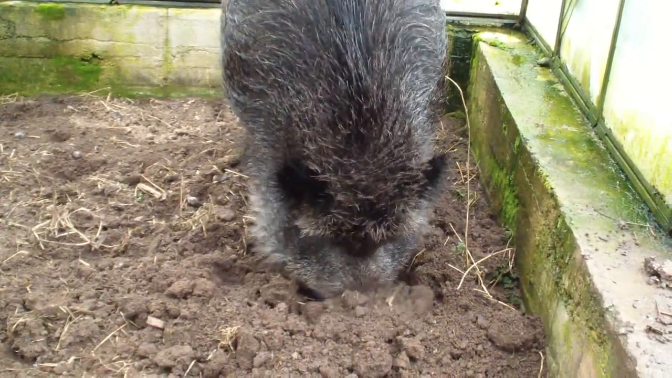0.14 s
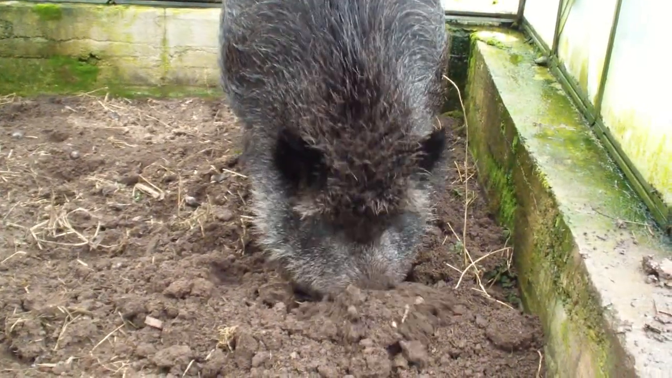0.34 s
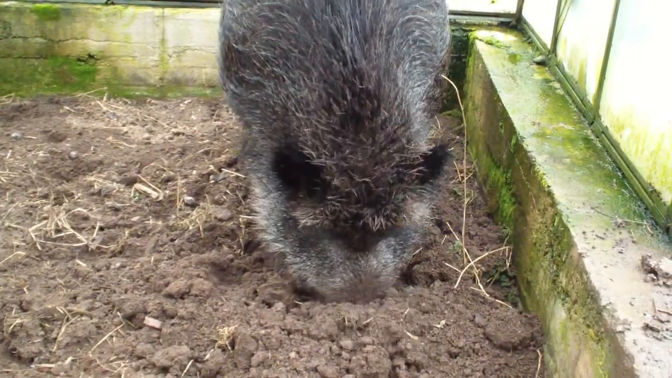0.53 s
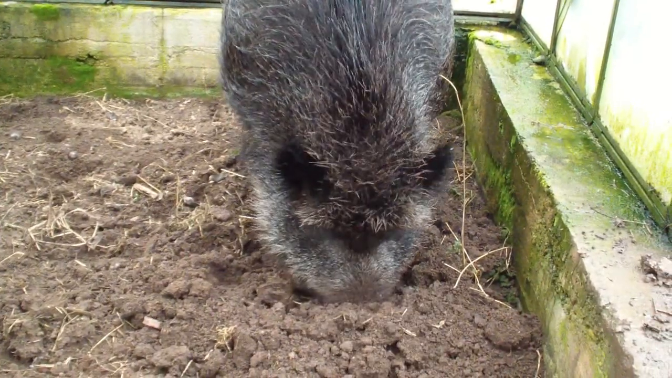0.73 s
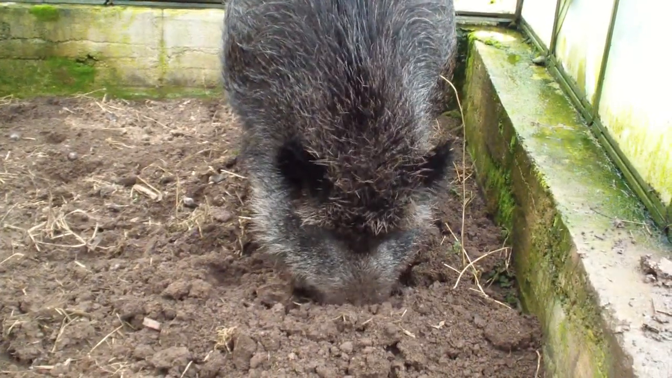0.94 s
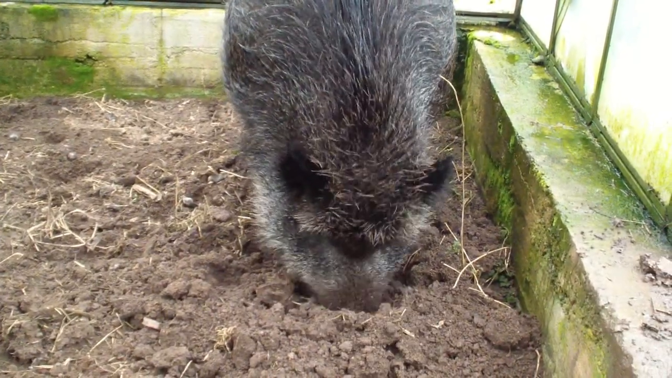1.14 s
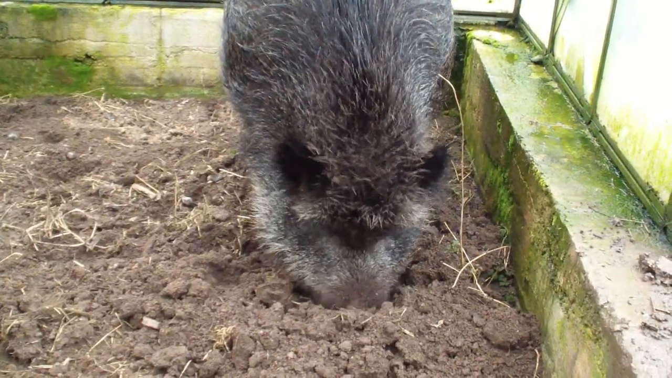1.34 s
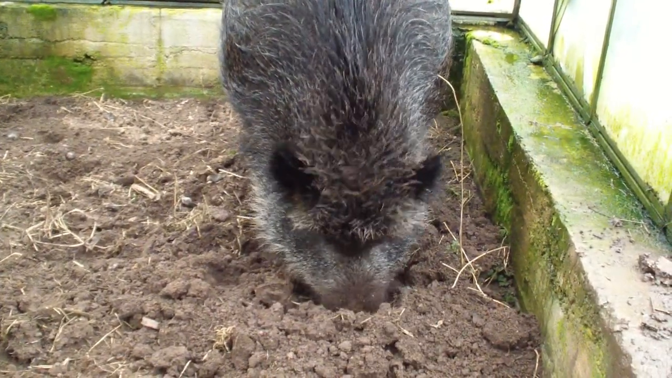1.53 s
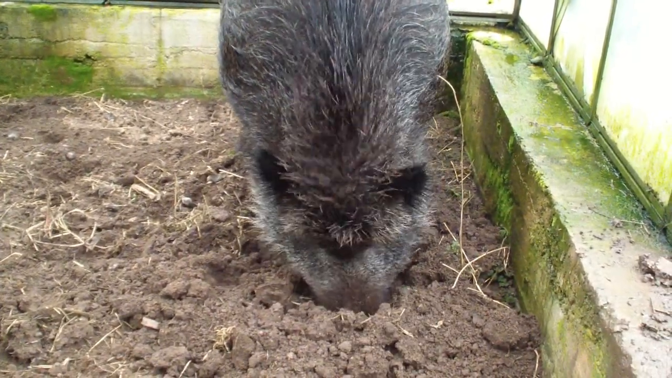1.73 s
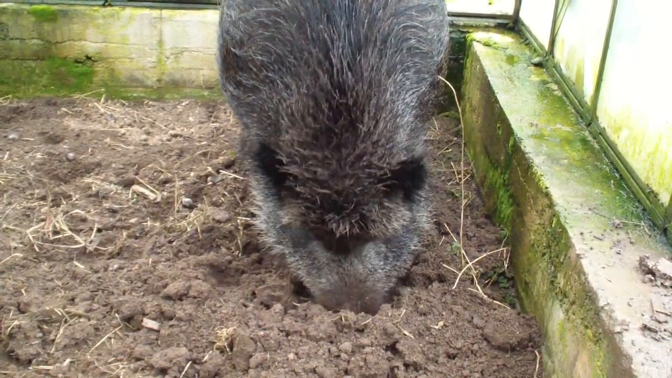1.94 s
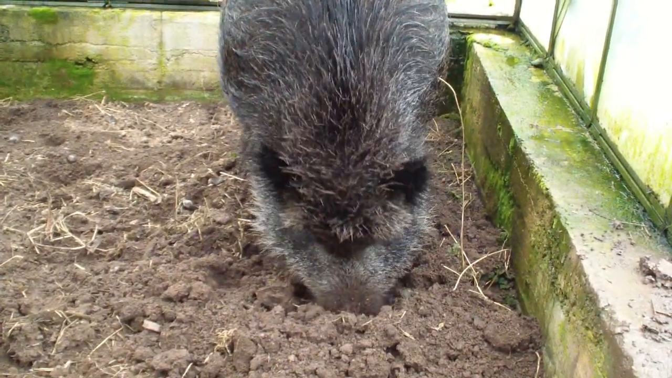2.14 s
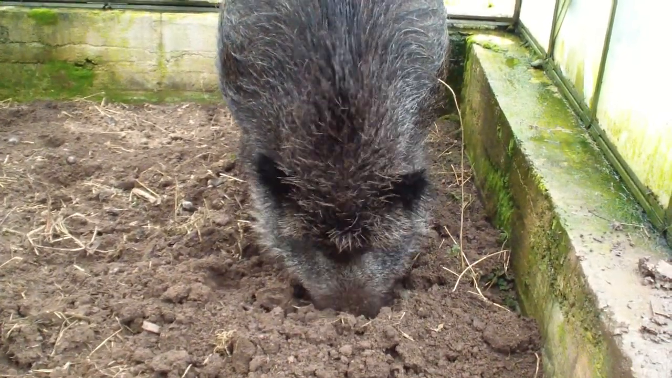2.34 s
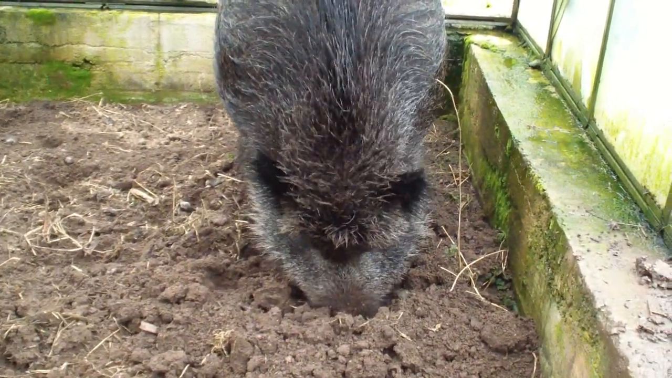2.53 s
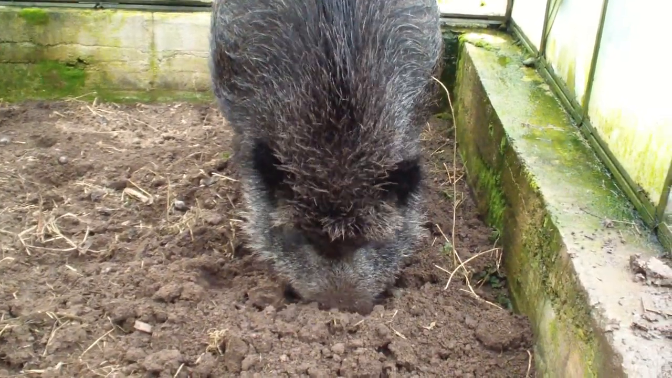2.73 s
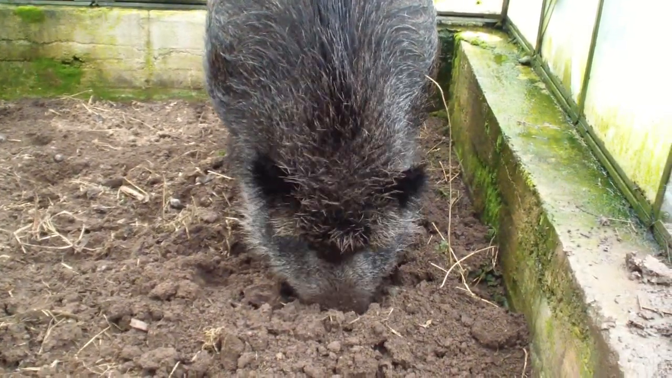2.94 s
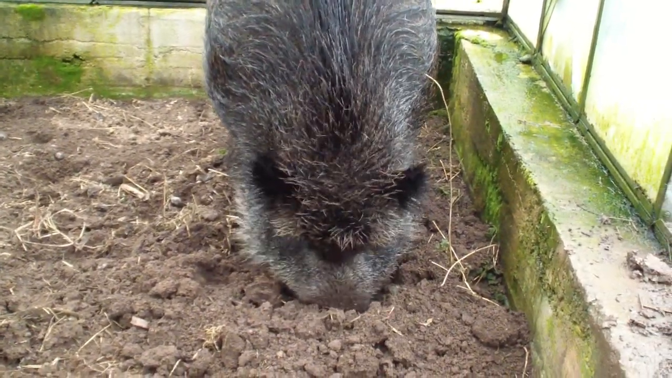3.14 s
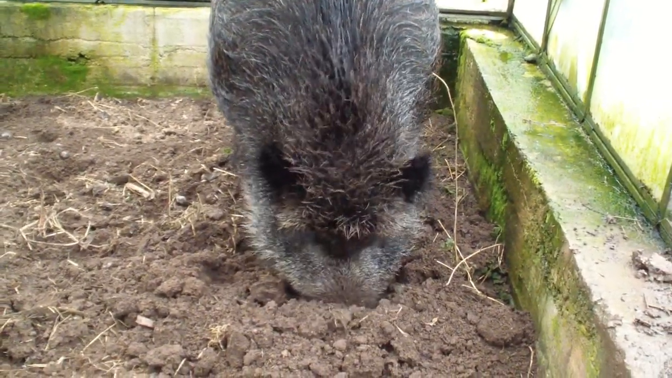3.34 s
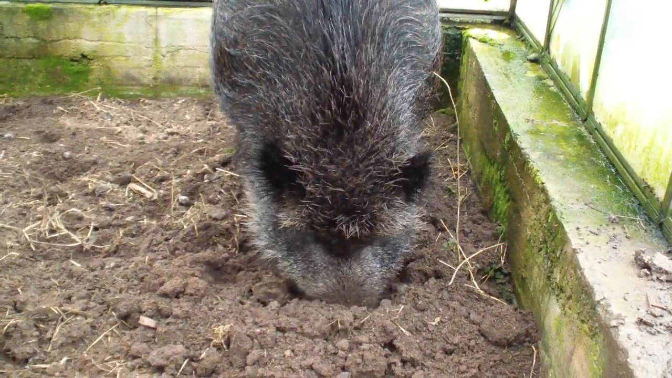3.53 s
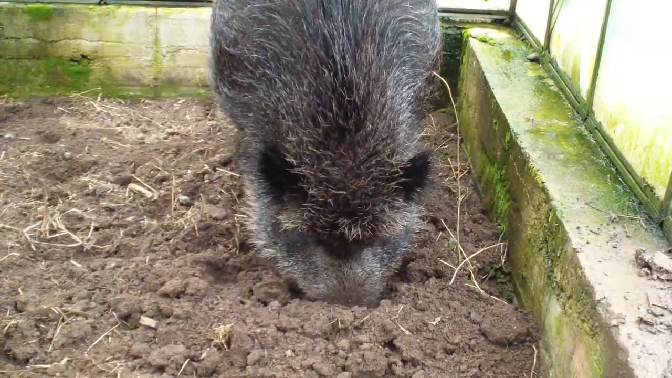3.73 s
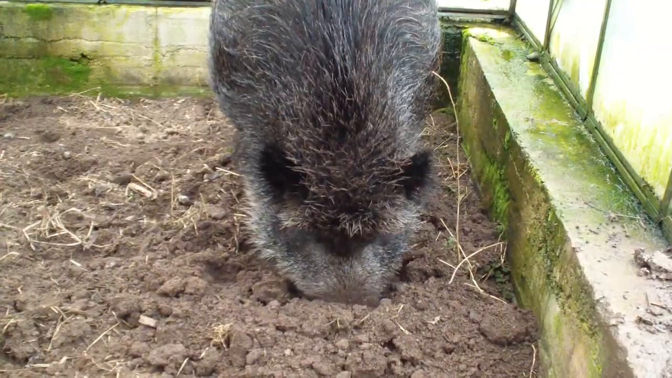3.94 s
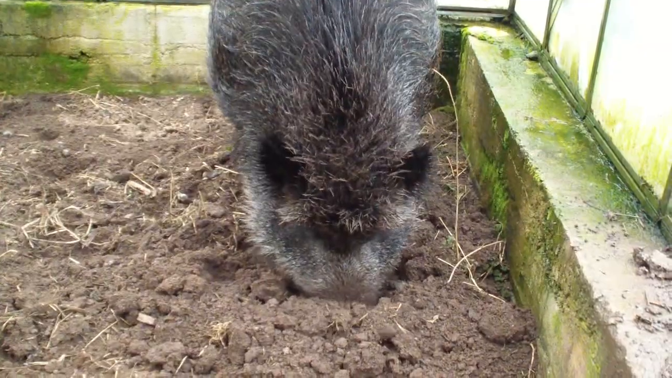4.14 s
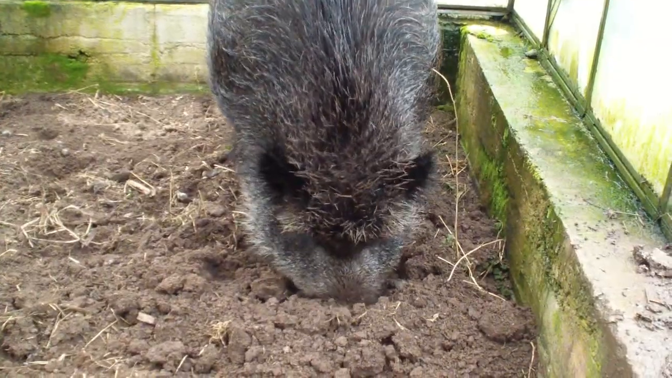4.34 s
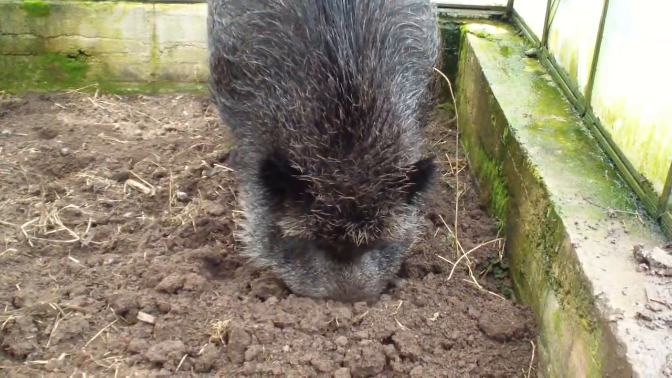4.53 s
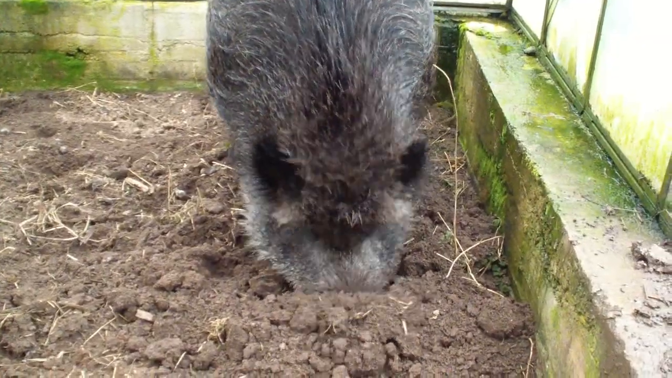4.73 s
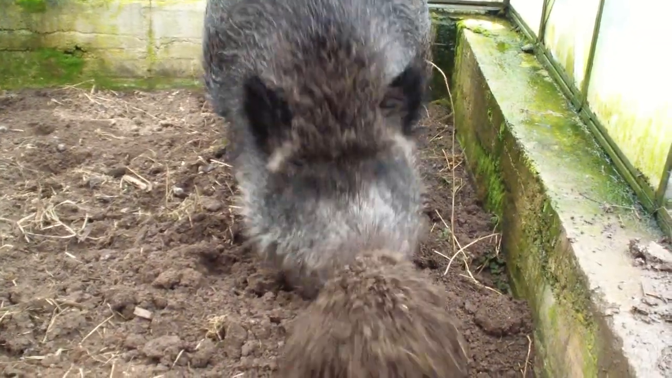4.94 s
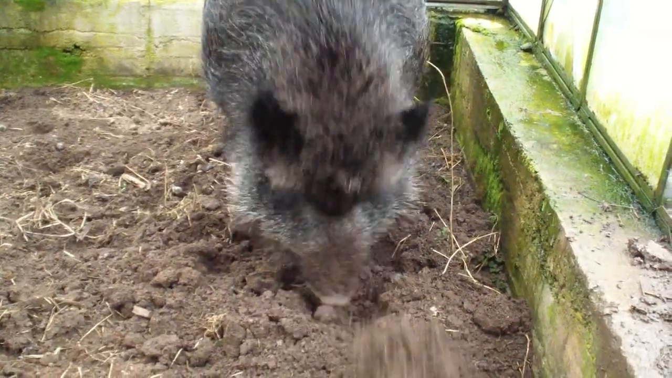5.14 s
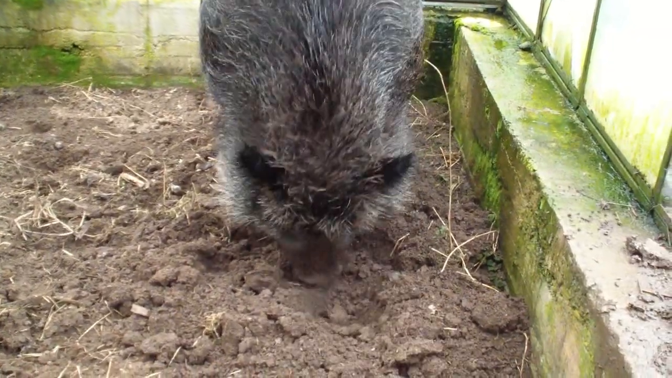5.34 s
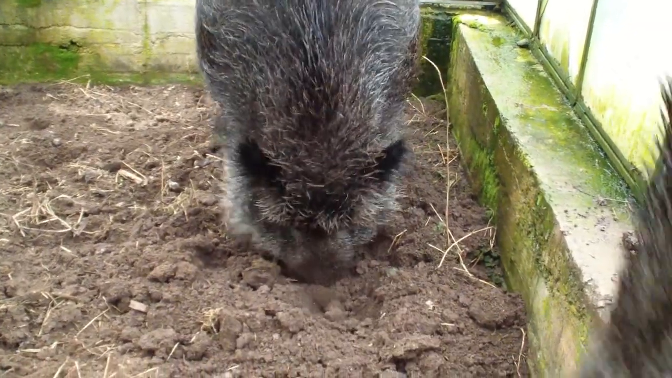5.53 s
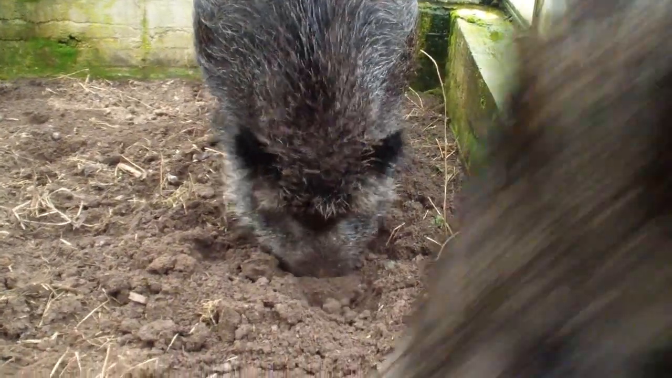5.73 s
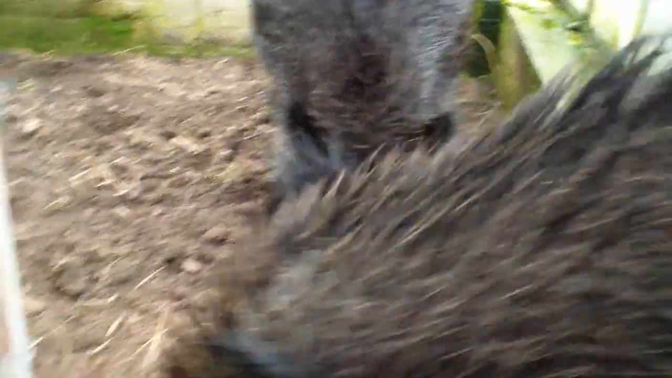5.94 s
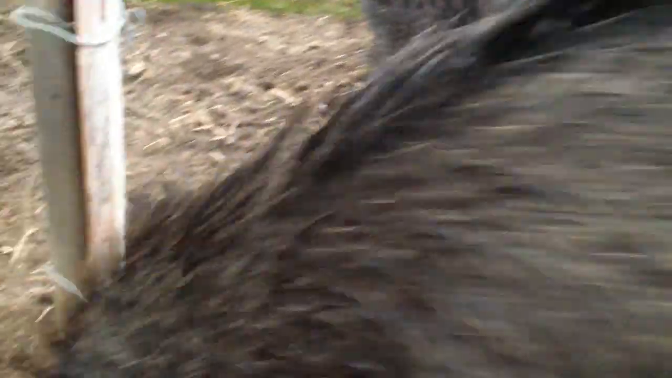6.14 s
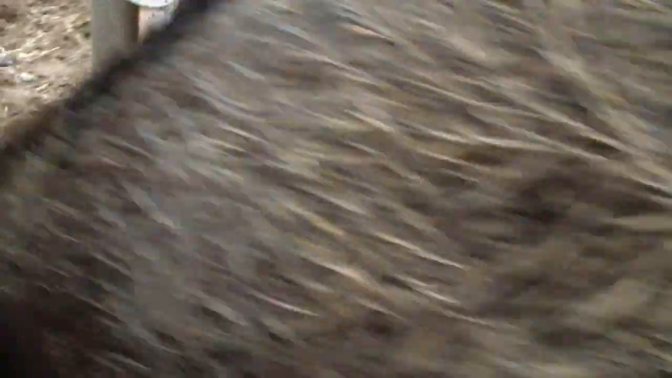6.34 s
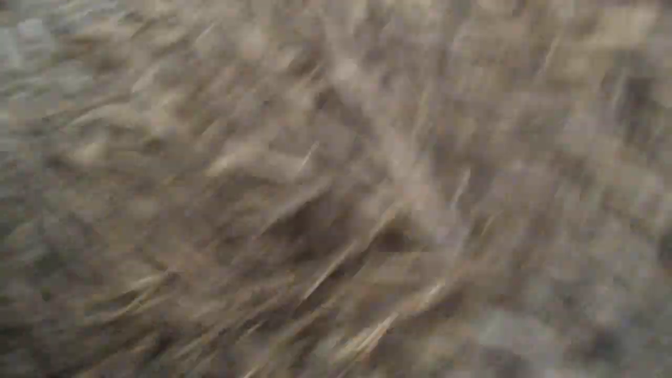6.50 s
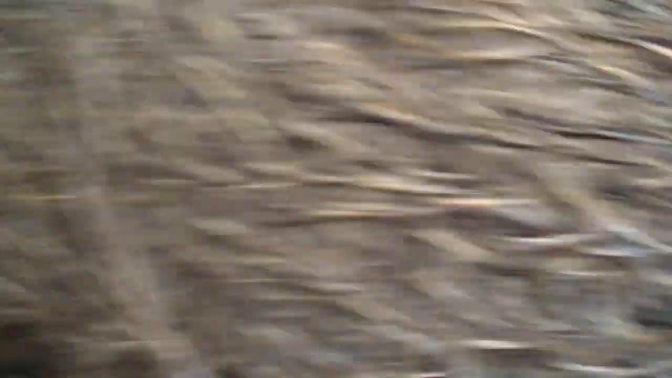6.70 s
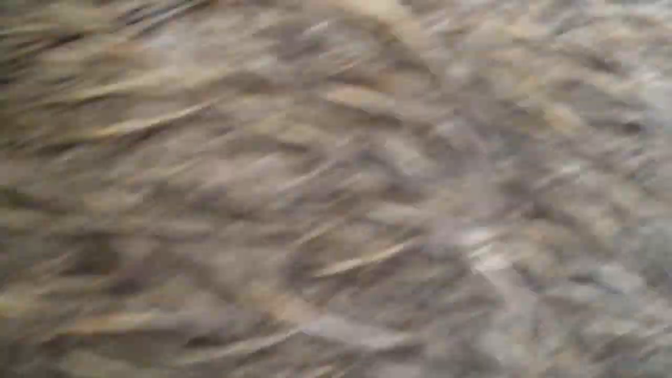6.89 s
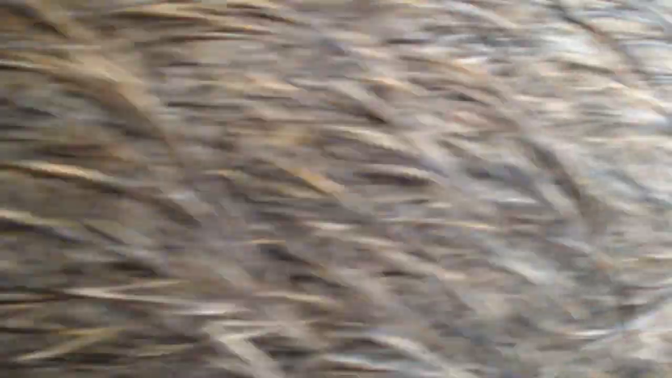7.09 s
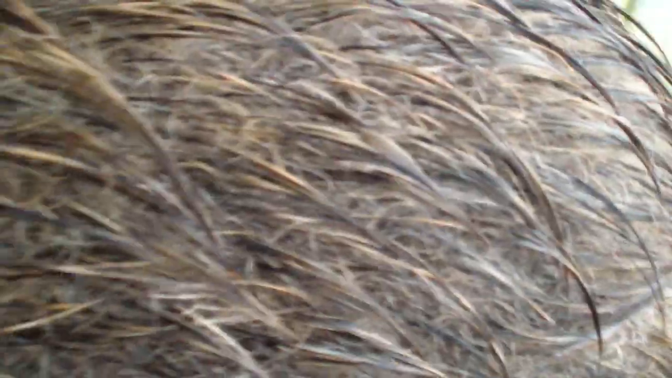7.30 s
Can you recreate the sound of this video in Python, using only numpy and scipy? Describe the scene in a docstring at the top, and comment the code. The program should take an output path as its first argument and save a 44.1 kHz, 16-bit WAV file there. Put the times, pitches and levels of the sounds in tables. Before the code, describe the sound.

Close stereo sound in a small glass-walled space with a short reverberation and quiet outdoor air. From 0 s a boar works loose soil: grains trickle, clods crumble, and a few small root ticks sound, with a sharper crack at 0.75 s. Around 1.05-1.6 s it blows a breathy, hissing puff into the earth, with short sniffs. Roots crackle at 1.65 s, then a very loud double snap at 2.02 s comes with deep dull thuds. Another blow follows at 2.8 s, small cracks at 3.4 s, and a pause with two tiny sniffs near 3.8 s. A fuller blow comes at 4.1-4.6 s, a snap at 4.3 s, and earth flung and pattering as sand around 5.1-5.4 s. At 5.4-5.5 s heavy knocks shake the stand; hard clacks hit at 5.9 and 6.18 s, thumps at 6.5 s, a tick at 6.67 s. Bristles scrape and rub throughout, fading to soft brushing with one small tap at 7.07 s.

```python
"""Rooting boar in a greenhouse

A wild boar blows and sniffs into loose soil (shaped noise), snaps roots (impulses rung through resonances)
and flings earth (grainy noise and random specks). A second boar then knocks a camera's stand (damped modes)
and drags its bristly flank along the case (rubbing noise with single scuffs).
The glass walls answer briefly (convolution with decaying noise) over a quiet outdoor background (steady noise).
"""
import sys
import numpy as np
from scipy import signal
from scipy.fft import rfft, irfft, next_fast_len
from scipy.io import wavfile
from scipy.ndimage import uniform_filter1d, map_coordinates

SR = 44100
rng = np.random.default_rng(int(sys.argv[2]) if len(sys.argv) > 2 else 0)


def to_wav(s):
    """Save 16-bit WAV."""
    ch = np.atleast_2d(s).T  # columns
    pcm = np.round(np.clip(ch, -1, 1) * 32767)  # PCM
    wavfile.write(sys.argv[1], SR, pcm.astype(np.int16))


N = 324576
T = np.arange(N) / SR
AGE = np.arange(SR * 3 // 5) / SR  # time since the onset of a single hit

# Levels are relative: each source adds a fixed trim where it is mixed.
# Snout blowing into soil: [t/s, rise/s, fall/s, airflow level/dB, hiss level/dB, hiss upper limit f/Hz,
# hollow f/Hz, hollow level/dB]
BLOW_EVENTS = [(1.05, 0.19, 0.39, -37.5, -45.5, 9300, 620, -43),
               (2.78, 0.28, 0.1, -38.3, -51, 10500, 900, -45.5),
               (4.12, 0.3, 0.21, -36.5, -48, 13600, 255, -41.5)]
# Air drawn through narrow nostrils: [t/s, rise/s, fall/s, level/dB]
SNIFF_EVENTS = [(.81, 0.021, 0.049, -50.5), (1.07, 0.039, .02, -43), (2.34, 0.042, 0.15, -54.5),
                (3.775, 0.0078, 0.012, -38.5), (3.89, 0.013, 0.022, -39)]
# Nostril resonances: [f/Hz, width/Hz, level/dB]
NOSTRIL_MODES = [(2090, 450, 12), (2760, 1240, 8)]
# Spectral density of the blown air: [f/Hz, level/dB per Hz]
BLOW_SPECTRUM = [(70, -8), (170, 3), (270, 3), (410, 0.5), (630, 2), (1100, 0), (2300, -3.5), (4500, -6.5),
                 (7000, -28)]
# Spectral density of the hissing soil: [f/Hz, level/dB per Hz]
HISS_SPECTRUM = [(1500, -58), (3500, -4), (5200, -0.5), (7500, 2.5), (10000, -1), (16000, -9)]
# Shoves of the snout through earth: [t/s, rise/s, fall/s, crumbling level/dB, ground rumble level/dB]
SHOVE_EVENTS = [(.24, 0.0099, 1, -45, -44), (.77, 0.04, 0.091, -81, -44), (1.7, 0.035, 0.29, -73, -34),
                (2.03, 0.069, 0.2, -65, -34), (2.645, 0.011, 0.049, -40, -39),
                (2.9, 0.069, 0.065, -37, -42.5), (3.28, .1, 0.15, -46, -54), (4.72, 0.36, 0.57, -40.5, -65)]
# Dull heaves of the ground: [t/s, level/dB, f/Hz]
HEAVE_EVENTS = [(0.27, -42, 255), (0.752, -43, 140), (0.767, -34, 87.5), (1.048, -36, 202),
                (1.674, -30, 200), (1.692, -32, 289), (1.737, -35, 149), (1.8, -43, 93), (2.033, -36, 105),
                (2.046, -24.5, 186), (2.092, -17.5, 73), (2.139, -28.5, 109), (2.64, -31, 158),
                (4.114, -30.5, 178), (5.2, -33, 272)]
# Small clods, grit and wet snout smacks; the last row is a knock on the case: [t/s, level/dB, f/Hz, t60/s]
SMALL_HITS = [(0.199, -39, 4770, 0.02), (0.207, -29, 4930, 0.014), (0.26, -38, 2470, 0.048),
              (.287, -40, 2580, 0.046), (.397, -45, 1200, 0.05), (0.575, -39, 5600, 0.06),
              (0.761, -33, 1720, 0.036), (1.873, -42, 1600, 0.018), (2.243, -32.5, 3920, 0.043),
              (2.253, -37.5, 7400, 0.15), (2.304, -31.5, 610, 0.049), (2.614, -32.5, 4660, 0.13),
              (2.657, -36, 2900, 0.029), (2.698, -36, 1500, .025), (2.9, -34.5, 3130, .04),
              (3.183, -36, 765, 0.03), (3.213, -35.5, 675, 0.054), (3.227, -38, 1070, 0.033),
              (3.394, -24, 1080, 0.039), (3.51, -37, 2900, 0.013), (3.562, -36.5, 700, 0.067),
              (4.011, -44, 4430, 0.014), (4.104, -32.5, 1190, 0.03), (4.47, -31, 600, 0.031),
              (4.765, -40, 2700, 0.027), (4.972, -35.5, 4800, 0.036), (5.026, -48, 2520, 0.016),
              (5.094, -37, 3420, 0.017), (5.258, -36, 1100, 0.039), (5.342, -38, 607, 0.036),
              (7.074, -25.5, 1280, 0.023)]
# Spectral density of crumbling earth: [f/Hz, level/dB per Hz]
CRUMB_SPECTRUM = [(150, -21), (400, 0.5), (850, -0.5), (1300, 1), (1700, 1.5), (2400, 3), (3500, -2),
                  (7000, -2.5), (11000, -5), (16000, -37)]
# Spectral density of the ground rumble: [f/Hz, level/dB per Hz]
GROUND_SPECTRUM = [(20, -65), (45, 8.5), (85, -0.5), (170, -4), (350, -12), (900, -45)]
# Roots breaking: [t/s, level/dB, tearing tail level/dB re the break, brightness/dB per octave, f/Hz]
SNAP_EVENTS = [(0.077, -35, -10, 10, 1940), (0.09, -43, -22, 13, 2300), (0.624, -29.5, -13, 4.5, 2680),
               (0.651, -27.5, -29, 26, 2420), (0.7472, -16, -24, 3, 2830), (0.7499, -19.5, -33, 2.5, 2050),
               (0.755, -24, -27, 11, 2400), (0.81, -28, -34, 3, 1820), (1.634, -26.5, -12, 3, 2170),
               (1.675, -20.5, -20, 0.5, 2370), (1.703, -25, -12, 2.5, 2700), (1.989, -24, -11, -2, 2550),
               (1.995, -20, -13, -4, 2420), (2.02, -2.5, -24, 2, 2330), (2.0216, -2.5, -31, -2, 2160),
               (2.031, -28, -17, 12, 2970), (2.042, -33, -17, 4, 2330), (2.063, -27, -14, -2, 2400),
               (2.099, -25.5, -22, -8, 2200), (2.307, -28.5, -9, 5, 2150), (2.614, -32, -3.5, 8, 2020),
               (2.64, -36, -5, 8, 2100), (2.655, -31, -6, 0, 2840), (2.747, -25, -13, 6, 2530),
               (3.214, -30, -28, -3, 3000), (3.357, -29, -28, 19, 2400), (3.38, -20.5, -32, 16, 2410),
               (3.395, -29, -24, 4, 3000), (3.582, -29.5, -16, 10, 2220), (4.324, -21, -27, 17, 2200)]
# Resonances of a breaking root of pitch ROOT_HZ: [f/Hz, width/Hz, level/dB]
ROOT_MODES = [(980, 137, 8), (1550, 120, 4), (2150, 280, 7), (2960, 450, 0), (3760, 1500, -10.5),
              (5160, 350, -3), (6270, 440, -1), (8700, 4000, -19.5)]
# Spectral density of earth torn open by a root: [f/Hz, level/dB per Hz]
TEAR_SPECTRUM = [(120, 7), (350, 5.5), (1000, 1), (1700, 1), (2400, 2), (3600, 3.5), (6500, -7.5),
                 (10000, -10), (16000, -38)]
# Earth lifted, then flung and raining back: [t/s, rise/s, fall/s, patter level/dB, sand level/dB]
FLING_EVENTS = [(4.7, 0.15, 0.15, -43, -72), (5.11, 0.093, 0.18, -37.5, -33)]
# Spectral density of pattering lumps: [f/Hz, level/dB per Hz]
PATTER_SPECTRUM = [(60, -14), (150, 2.5), (280, 0.5), (400, -1), (600, -4.5), (950, -13), (2000, -19),
                   (5000, -30)]
# Spectral density of falling sand: [f/Hz, level/dB per Hz]
SAND_SPECTRUM = [(710, -36), (1200, -6), (1630, -13), (2530, -2), (4130, -3), (7330, 0), (12300, -2.5),
                 (15200, -5), (16000, -18)]
# Blows on the stand: [t/s, level/dB, knock level/dB re the blow, knock f/Hz, sway t60/s,
# tube, crunch and clink level/dB re the blow, clink f/Hz]
BUMP_EVENTS = [(5.404, -17.5, -17, 806, 0.1, -27, -15, -32, 1480),
               (5.4402, -10.5, -2.5, 760, 0.082, -17, -21, -18, 1456),
               (5.4777, -7, -3.5, 814, 0.087, -10, -19, -18, 2050),
               (5.4865, -30, -3, 900, 0.06, -12, -23, 4.5, 1280),
               (5.504, -34, 0, 905, 0.13, -12, -16, 2, 1265),
               (5.524, -25.5, -4, 795, 0.27, -9.5, -4.5, -7, 1100),
               (5.9096, -24.5, 1, 700, 0.2, -6, 2, 0.5, 1430),
               (6.183, -27.5, 8.5, 624, 0.36, -9, -17, -2, 1290),
               (6.473, -15.5, -17, 485, 0.27, -21, -20, -37, 1160),
               (6.505, -8.5, -8, 580, 0.15, -36, -15.5, -24, 1054),
               (6.548, -26, -13, 520, 0.18, -28, -30, -25, 890)]
# Sway of the stand: [multiple of SWAY_HZ, level/dB, share of the blow's sway t60]
SWAY_MODES = [(.33, -19.5, 3.5), (.48, -20, 4.7), (.7, -6, 1.33), (1, 5.5, 0.6), (1.21, -32, .9),
              (1.72, -12, 0.75), (2.2, -1.5, 0.14)]
# Knock of the stand: [multiple of the knock pitch, width as a share of that pitch, level/dB]
KNOCK_MODES = [(.42, 0.06, -12), (.74, 0.29, 0.5), (1, 0.15, 8.5), (1.36, .3, 2.5), (1.581, 0.27, -1)]
# Tube of the stand: [f/Hz, level/dB, t60/s]
TUBE_MODES = [(703, 4, 0.097), (890, -9, .07), (1080, 4, 0.25), (1300, 1, 0.16)]
# Loose joints crunching: [f/Hz, width/Hz, level/dB]
CRUNCH_MODES = [(2160, 190, 2.5), (3000, 460, -2)]
# Hard ticks on the case: [t/s, level/dB, rattle level/dB re the tick, rattle t60/s,
# bright snap level/dB re the tick, brightness/dB per octave, clack f/Hz of the struck spot]
TICK_EVENTS = [(5.2047, -38, -14, .05, 4, 6, 1500), (5.906, -28.5, -22, .1, 3, -1, 1500),
               (5.9099, -8, -8, 0.14, -24, 3.5, 1490), (5.9185, -3.5, -12.5, 0.11, -30, -2.5, 1510),
               (6.117, -34, -24, 0.045, 2, 8, 1400), (6.182, -2.5, -15, 0.36, -17.5, 2, 1230),
               (6.1834, -1.5, -17, .1, -15, 2.5, 1450), (6.6687, -16, -7, 0.13, -1, 4, 1310),
               (6.674, -27, -18, .1, 5, 7, 1400)]
# Resonances of the case: [f/Hz, width/Hz, level/dB]
CASE_MODES = [(280, 89, 3), (636, 480, 0), (3180, 400, -1), (3830, 370, 3), (4900, 380, -1.5),
              (7100, 270, 1.5), (11800, 650, -27)]
# Resonances of a tick's bright snap: [f/Hz, width/Hz, level/dB]
BRIGHT_SNAP_MODES = [(3240, 820, 2.5), (7600, 2700, 1), (12200, 4400, -5.5)]
# Spectral density of the rattling case: [f/Hz, level/dB per Hz]
RATTLE_SPECTRUM = [(100, 5), (250, 11.5), (620, 4), (900, 1.5), (1350, 1.5), (2500, -4), (5000, -8),
                   (15000, -13)]
# Strokes of the flank over the case: [t/s, rise/s, fall/s, rubbing level/dB, bristle level/dB]
STROKE_EVENTS = [(5.38, 0.096, 0.21, -39, -44.5), (5.74, 0.072, 0.05, -43, -43),
                 (5.93, 0.018, 0.3, -48.5, -47), (6.28, 0.017, 0.19, -50.5, -53.5),
                 (6.54, 0.019, 0.26, -46, -47), (6.85, 0.02, 0.33, -46.5, -59), (7.32, 0.028, .1, -47, -61)]
# Tufts of bristles scuffing the case: [t/s, level/dB, treble level/dB, t60/s, rasp f/Hz]
SCUFF_EVENTS = [(5.602, -22.5, -49, 0.09, 2470), (5.619, -23.5, -47, 0.05, 2360),
                (5.756, -22, -35, 0.085, 2030), (5.794, -20, -21, 0.2, 2400),
                (6.068, -25, -22.5, 0.15, 1300), (6.126, -21.5, -46, 0.15, 1500),
                (6.147, -19.5, -38, 0.13, 1610), (6.279, -22.5, -19.5, 0.16, 1500),
                (6.531, -43, -21.5, 0.059, 2500), (6.565, -51, -25, 0.067, 1500),
                (6.6, -45, -25, .04, 2500), (6.6358, -23, -39, 0.034, 1410), (6.835, -35, -25, 1, 2800)]
# Spectral density of the rubbing flank: [f/Hz, level/dB per Hz]
RUB_SPECTRUM = [(35, -33), (60, -3.5), (118, -11), (161, 3.5), (226, -12.5), (259, -2), (462, -11.5),
                (810, -13), (1330, -15), (2290, -17.5), (2810, -20.5), (3500, -20.5), (4550, -28.5),
                (7700, -120)]
# Spectral density of the bristles: [f/Hz, level/dB per Hz]
BRISTLE_SPECTRUM = [(900, -37), (2200, -6), (3600, -2), (5200, -1.5), (7200, -0.5), (10000, -2),
                    (13000, -6.5), (16000, -12)]
# Decay of the glass walls: [f/Hz, t60/s]
WALL_DECAY = [(100, 0.24), (1000, 0.28), (4000, 0.23), (14000, 0.17)]
# Spectral density of the background air: [f/Hz, level/dB per Hz]
AIR_SPECTRUM = [(20, -2.5), (50, 5), (110, -1.5), (200, -2.5), (450, -7), (850, -8), (1300, -9),
                (1700, -11), (2400, -10.5), (3800, -15), (7700, -17), (15500, -22.5)]
# Left-right coherence: [f/Hz, correlation]
COHERENCE = [(100, 0.89), (400, 0.95), (1000, 0.99), (2500, 1), (5000, 0.78), (9000, 0.51), (15000, 0.26)]
# Phase by which the left port trails at slant 1: [f/Hz, phase/rad]
PORT_LAG = [(100, 0), (1500, 0.5), (3500, 0.84), (6000, 1.11), (8500, 1.5), (11500, 4), (15000, -4)]
# Left-right level difference: [f/Hz, level/dB]
PORT_LEAN = [(50, 1), (300, 2), (1200, 2), (3000, 1), (9000, 0.5), (14000, -1)]

EDGE_S, ROUNDNESS = 0.068, 0.9  # fade at either end of a movement; 1 = pointed swell, 2 = round
# Air and hiss at a blow's ends lie this far under its middle.
# The hiss peaks earlier, before the loose soil is cleared.
BLOW_EDGE_DB, HISS_EDGE_DB, HISS_LEAD_S = 8, 17, 0.0062
BLOW_ROUNDNESS, HISS_ROUNDNESS = 1.15, 2.05
GRIT_DB = -10  # re the airflow
SNIFF_EDGE_DB, SHOVE_EDGE_DB, FLING_EDGE_DB, STROKE_EDGE_DB = 4.5, 11, 6, 6.5
# While the snout is dug in, the earth keeps crumbling and rumbling between shoves.
CRUMBLE_DB, RUMBLE_DB = -47.5, -46.5
DIG_START_S, DIG_END_S = 0.64, 5.3
PAUSE_S, PAUSE_HALF_S = 3.83, 0.21  # it holds still to sniff: middle and half length
# Lesser crumbs roll off at random until the digging ends.
CRUMB_DB, CRUMB_SCATTER_DB = -43, 2.5
CRUMB_HZ, CRUMB_OCTAVES, CRUMB_T60_S = 2700, 1, 0.06
TRICKLE_DB, TRICKLE_PER_S = -57, 80
HIT_WIDTH = 4.3  # width/Hz of a small hit's resonance per square root of its pitch
HEAVE_T60_S = 0.23
ROOT_HZ = 2222
STRAIN_S, STRAIN_DB, TEAR_T60_S = 0.005, -19, 0.16
SWAY_HZ, CLINK_T60_S = 163.8, 0.047
CLACK_WIDTH_HZ, CLACK_DB = 350, 12
AIR_DB, TOP_HZ = -49.7, 16100


def snout():
    """Turbulent flow: blown air hums in the hollow round the snout and stirs hiss and grit; sniffs rasp."""
    air = rush(BLOW_SPECTRUM, grain_db=2) * amp(1.2 * wobble(60))
    grit = specks(rate=160, scatter_db=2.5)
    blow = np.zeros((2, N))
    for s, rise, fall, db, hiss_db, top_hz, hollow_hz, hollow_db in BLOW_EVENTS:
        flow = swell(s, rise, fall, BLOW_EDGE_DB, BLOW_ROUNDNESS)
        hiss = rush(HISS_SPECTRUM, grain_db=0.5)
        hiss = unit(filtered(hiss, lambda hz: 1 / np.sqrt(1 + (hz / top_hz) ** 20)))
        hollow = unit(spread(gritty(grain_db=3.5, size=N), body([(hollow_hz, 0.5 * hollow_hz, 0)])))
        caving = amp(2.8 * wobble(24))
        blow += flow * amp(db) * (air + amp(GRIT_DB) * grit)
        blow += flow * amp(hollow_db - 1.5) * caving * hollow
        hiss_flow = swell(s, rise - HISS_LEAD_S, fall + HISS_LEAD_S, HISS_EDGE_DB, HISS_ROUNDNESS)
        blow += amp(hiss_db + 5.5) * hiss_flow * hiss

    def nasal(hz):
        """Resonance: the nostrils' modes within a band that weakens the bass and the treble."""
        return body(NOSTRIL_MODES)(hz) / np.sqrt(1 + (1900 / (hz + 1)) ** 18 + (hz / 3600) ** 4)

    flutter = amp(1.4 * wobble(30))
    draw, = movements(SNIFF_EVENTS, SNIFF_EDGE_DB)
    rasp = unit(spread(gritty(grain_db=0.5, size=N), nasal))
    return flutter * (blow + draw * amp(1.5) * rasp)


def soil_and_small_hits():
    """Granular friction and impact: earth crumbles in clumps and heaves dully; small hits ring briefly."""
    dug_in = np.clip(np.minimum(T - DIG_START_S, DIG_END_S - T) / EDGE_S, 0, 1)
    dug_in = dug_in * np.clip((np.abs(T - PAUSE_S) - PAUSE_HALF_S) / EDGE_S + 1, 0, 1)
    steady = amp([[CRUMBLE_DB], [RUMBLE_DB]]) * dug_in
    crumble, rumble = movements(SHOVE_EVENTS, SHOVE_EDGE_DB) + steady
    clumps = amp(2.5 * wobble(28))
    out = crumble * amp(-5.5) * clumps * rush(CRUMB_SPECTRUM, grain_db=2)
    out += rumble * amp(-7.0) * rush(GROUND_SPECTRUM)
    out += amp(TRICKLE_DB) * (T < DIG_END_S) * specks(TRICKLE_PER_S, scatter_db=-0.5)
    for s, db, hz in HEAVE_EVENTS:
        modes = [(hz, 0.18 * hz, 0), (2.2 * hz, 1.03 * hz, -7)]
        thud = burst(fade(HEAVE_T60_S, rise=0.00037), modes)
        add(out, s, amp(db - 5) * thud)
        tone = ring([(hz, 0, HEAVE_T60_S)], rise=0.0014, scatter_db=0, chatter_db=-3.5)
        add(out, s, amp(db - 8.5) * tone)
    for s, db, hz, t60 in SMALL_HITS + loose_crumbs(count=8):
        modes = [(hz, HIT_WIDTH * np.sqrt(hz), 0), (1.1 * hz, 0.014 * hz, -10)]
        hit = burst(fade(t60, rise=0.0025), modes, grain_db=3.0)
        add(out, s, amp(db - 4.5) * hit)
    return out


def loose_crumbs(count):
    """Random granular events: rows laid out as in SMALL_HITS, with scattered level and pitch."""
    when = rng.uniform(0, DIG_END_S, count)
    scatter = np.clip(rng.standard_normal((count, 2)), -2, 2)
    return [(s, CRUMB_DB + CRUMB_SCATTER_DB * a, CRUMB_HZ * 2 ** (CRUMB_OCTAVES * b), CRUMB_T60_S)
            for s, (a, b) in zip(when, scatter)]


def roots():
    """Brittle fracture: a root strains for a few milliseconds, breaks, and tears out of the earth."""
    out = np.zeros((2, N))
    for s, db, tail_db, bright_db, hz in SNAP_EVENTS:
        # each root has its own pitch and brightness
        modes = [(pitch * hz / ROOT_HZ, width, level) for pitch, width, level in ROOT_MODES]
        modes = brighter(modes, bright_db)
        fracture = crack(modes, t60=0.008, splinter_db=-7)
        strain = (AGE / STRAIN_S) * (AGE < STRAIN_S)
        add(out, s - STRAIN_S, amp(db + STRAIN_DB) * burst(strain, modes))
        add(out, s + 0.00064, amp(db - 6.5) * fracture)
        clumps = amp(3.5 * wobble(140, size=len(AGE)))
        tear = clumps * fade(TEAR_T60_S, rise=0.00021)
        tear = tear * rush(TEAR_SPECTRUM, grain_db=5.5, size=len(AGE))
        add(out, s + 0.0039, amp(db - 2.5 + tail_db) * tear)
    return out


def toss():
    """Impact noise: earth flicked at the camera patters in lumps and rains as sand with coarser grit."""
    patter, sand = movements(FLING_EVENTS, FLING_EDGE_DB)
    grit = amp(-9) * specks(rate=170, scatter_db=4)
    clumps = amp(1.3 * wobble(45))
    lumps = patter * amp(-1.5) * rush(PATTER_SPECTRUM, grain_db=3.5)
    return lumps + sand * amp(-2.0) * clumps * (rush(SAND_SPECTRUM, grain_db=3.0) + grit)


def stand():
    """Modal excitation: blows sway the stand, knock its joints and ring its tube; ticks rattle the case."""
    out = np.zeros((2, N))
    for s, db, knock_db, knock_hz, t60, tube_db, crunch_db, clink_db, clink_hz in BUMP_EVENTS:
        # the animal's weight against the stand damps the sway
        sway = [(SWAY_HZ * multiple, level, t60 * share) for multiple, level, share in SWAY_MODES]
        add(out, s, amp(db - 4.5) * ring(sway, rise=0.0032, scatter_db=1))
        modes = [(knock_hz * multiple, knock_hz * width, level) for multiple, width, level in KNOCK_MODES]
        knock = crack(modes, t60=0.09, splinter_db=-3)
        add(out, s + 0.00145, amp(db + knock_db - 5.5) * knock)
        clink = ring([(clink_hz, 0, CLINK_T60_S)], rise=0.00099, scatter_db=0)
        add(out, s + 0.00187, amp(db + clink_db - 2.5) * clink)
        tube = ring(TUBE_MODES, rise=0.00055, scatter_db=2, chatter_db=4)
        add(out, s + 0.00156, amp(db + tube_db - 8.0) * tube)
        crunch = burst(fade(0.065, rise=0.000094), CRUNCH_MODES, grain_db=11.0)
        add(out, s + 0.00142, amp(db + crunch_db - 7.0) * crunch)
    for s, db, rattle_db, t60, snap_db, bright_db, clack_hz in TICK_EVENTS:
        modes = [(clack_hz, CLACK_WIDTH_HZ, CLACK_DB)] + CASE_MODES
        tick = crack(brighter(modes, bright_db), t60=0.0048, splinter_db=-9)
        add(out, s + 0.0011, amp(db - 11.5) * tick)
        bright_snap = burst(fade(0.0072, rise=0.0009), BRIGHT_SNAP_MODES)
        add(out, s, amp(db + snap_db - 2.5) * bright_snap)
        rattle = fade(t60, rise=0.00068) * rush(RATTLE_SPECTRUM, grain_db=1.5, size=len(AGE))
        add(out, s, amp(db - 10.5 + rattle_db) * rattle)
    return out


def flank():
    """Stick-slip friction: coarse hair rubs over the case, single tufts catching and springing free."""
    rub, bristle = movements(STROKE_EVENTS, STROKE_EDGE_DB)
    catching = amp(2.2 * wobble(20))
    out = rub * catching * amp(4.0) * rush(RUB_SPECTRUM, grain_db=0.5)
    flicking = amp(2 * wobble(30))
    out += bristle * flicking * amp(6.5) * rush(BRISTLE_SPECTRUM, grain_db=2.0)
    for s, db, treble_db, t60, hz in SCUFF_EVENTS:
        snagging = amp(4 * wobble(170, size=len(AGE)))
        stroke = snagging * fade(t60, rise=0.00035)
        rasp = burst(stroke, [(0.5 * hz, 1.0 * hz, -6), (hz, 0.5 * hz, 0)], grain_db=3.5)
        add(out, s, amp(db - 10.0) * rasp)
        treble = stroke * rush(BRISTLE_SPECTRUM, grain_db=2.0, size=len(AGE))
        add(out, s, amp(treble_db - 12.5) * treble)
    return out


def greenhouse(x):
    """Reverberation: convolution with noise that decays exponentially, soonest in the high treble."""
    hz, t, z = signal.stft(rng.standard_normal((2, SR // 2)), SR, nperseg=256)
    decay = np.exp(-np.log(1000) * t / along(WALL_DECAY, hz)[:, None])
    tail = signal.istft(z * decay, SR, nperseg=256)[1]
    tail = spread(tail, np.ones_like)
    mono = x.mean(axis=0)[None]
    return signal.fftconvolve(mono, tail / np.linalg.norm(tail[0]), axes=1)[:, :N]


def background():
    """Stationary noise: the quiet outdoor air."""
    return amp(AIR_DB) * rush(AIR_SPECTRUM)


def swell(s, rise, fall, edge_db, roundness):
    """Amplitude envelope: from edge_db under its peak at s it swells and ebbs, faded outside by EDGE_S."""
    away = np.interp(T, [s, s + rise, s + rise + fall], [1, 0, 1])
    gate = np.clip(np.minimum(T - s, s + rise + fall - T) / EDGE_S + 1, 0, 1)
    return gate * amp(-edge_db * away ** roundness)


def movements(rows, edge_db):
    """Superposition: add (t, rise, fall, level, ..) movements into one gain curve per level column."""
    return sum(np.outer(amp(levels), swell(s, rise, fall, edge_db, ROUNDNESS))
               for s, rise, fall, *levels in rows)


def crack(modes, t60, splinter_db):
    """Impulse response: a sudden release and a short spray of splinters ring through resonances."""
    spray = unit(gritty(grain_db=14.5, size=len(AGE)) * fade(t60, rise=0.00057))
    push = amp(splinter_db) * spray / np.sqrt(len(AGE))
    push[0, 0] += 1  # the part common to both sides
    push[1, 8] += 1  # the part that differs between them, 8 samples later
    return crest(spread(push, body(modes)))


def burst(envelope, modes, grain_db=0):
    """Filtered excitation: a puff of grainy noise rings through resonances."""
    return crest(spread(gritty(grain_db, len(AGE)) * envelope, body(modes)))


def ring(modes, rise, scatter_db, chatter_db=0):
    """Damped modes of randomly scattered strength; a loose contact makes each one chatter as it dies."""
    def mode(hz, db, t60):
        """Free vibration: one decaying sinusoid."""
        chatter = chatter_db * wobble(81, size=len(AGE))
        strength = amp(db + scatter_db * rng.standard_normal() + chatter)
        return strength * fade(t60, rise) * np.sin(2 * np.pi * hz * AGE)
    return crest(sum(mode(*row) for row in modes))


def specks(rate, scatter_db):
    """Random impulses: single grains of earth land at a mean rate per second; rms 1."""
    landing = rng.random(N) < rate / SR
    sizes = amp(scatter_db * np.clip(rng.standard_normal(N), -2, 2))
    impulses = landing * sizes * rng.choice([-1, 1], (2, N))
    return unit(spread(impulses, lambda hz: amp(along(CRUMB_SPECTRUM, hz))))


def rush(spectrum, grain_db=0, size=N):
    """Coloured noise: grainy stereo noise of rms 1 with the given spectrum."""
    return unit(spread(gritty(grain_db, size), lambda hz: amp(along(spectrum, hz))))


def gritty(grain_db, size):
    """Modulated noise: two unrelated noises in half-millisecond grains whose levels scatter by grain_db."""
    sizes = np.repeat(np.clip(rng.standard_normal(size // 22 + 1), -3, 3), 22)[:size]
    return rng.standard_normal((2, size)) * amp(grain_db * sizes)


def body(modes):
    """Resonance: the causal response of (f, width, level) modes with alternating signs."""
    def response(f):
        """Modal sum: second-order band-passes added together."""
        return sum((-1) ** k * amp(db) * 1j * f * w / (c * c - f * f + 1j * f * w)
                   for k, (c, w, db) in enumerate(modes))
    return response


def brighter(modes, bright_db):
    """Spectral tilt: change (f, width, level) modes by bright_db an octave about 2200 Hz."""
    return [(hz, width, level + bright_db * np.log2(hz / 2200)) for hz, width, level in modes]


def spread(pair, response):
    """Coherence: colour two unrelated signals and mix them, bass much alike left and right, treble apart."""
    def split(hz):
        """Mid and side shares whose power difference is the wanted correlation."""
        turn = np.arccos(np.clip(along(COHERENCE, hz), 0, 1)) / 2
        return response(hz) * np.array([np.cos(turn), np.sin(turn)])
    mid, side = filtered(pair, split)
    return np.array([mid + side, mid - side])


def arrive(x, slant):
    """Interaural phase: at slant > 0 the left port trails by PORT_LAG; the bass hardly differs."""
    halves = np.array([[0.5], [-0.5]])
    return filtered(x, lambda hz: np.exp(-1j * slant * along(PORT_LAG, hz) * halves))


def filtered(x, response):
    """Linear filtering: multiply the spectrum of x by a complex response of frequency."""
    n = x.shape[-1]
    m = next_fast_len(n + 4096, real=True)
    return irfft(rfft(x, m) * response(np.fft.rfftfreq(m, 1 / SR)), m)[..., :n]


def fade(t60, rise):
    """Free decay: a rise, then an exponential fall of 60 dB in t60."""
    return np.exp(-np.log(1000) * AGE / max(t60, 1e-4)) * (1 - np.exp(-AGE / max(rise, 1e-5)))


def wobble(rate, size=N):
    """Slow modulation: a smooth random curve with rate knots a second."""
    knots = rng.standard_normal(int(size * rate / SR) + 4)
    return map_coordinates(knots, [T[:size] * rate], order=2)


def along(points, hz):
    """Logarithmic frequency scale: read (f, value) points by linear interpolation on it."""
    f, v = np.transpose(points)
    return np.interp(np.log(hz + 1), np.log(f + 1), v)


def amp(db):
    """Level to amplitude: decibels become a gain."""
    return 10 ** (np.asarray(db) / 20)


def unit(x):
    """Normalisation: scale to rms 1."""
    return x / np.sqrt(np.mean(x ** 2) + 1e-20)


def crest(x):
    """Short-time power: scale a hit so that its loudest two milliseconds have rms 1."""
    power = np.mean(np.atleast_2d(x) ** 2, axis=0)
    return x / np.sqrt(uniform_filter1d(power, size=88).max() + 1e-20)


def add(track, s, sound):
    """Superposition: mix a sound into the track at time s."""
    start = max(round(s * SR), 0)
    track[:, start:start + sound.shape[-1]] += sound[..., :N - start]


def scene():
    """Superposition of the digging boar, its room, the contacts on stand and case, and the air."""
    boar = snout() + soil_and_small_hits() + roots()
    earth = toss()
    room = amp(-8.5) * greenhouse(boar + earth) + background()
    out = arrive(boar + room, slant=1.0) + arrive(earth, slant=0.18)
    return out + arrive(stand(), slant=0.84) + arrive(flank(), slant=-0.95)


def record(dry):
    """Band limit and balance: the left port is a little louder except in the top treble."""
    halves = np.array([[0.5], [-0.5]])
    return filtered(dry, lambda hz: amp(halves * along(PORT_LEAN, hz)) * (hz < TOP_HZ))


dry = scene()
out = record(dry)
to_wav(out)
```